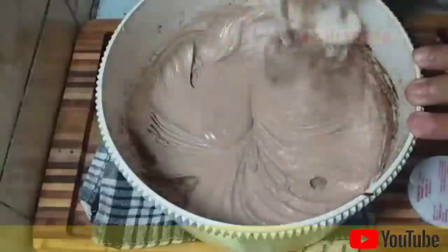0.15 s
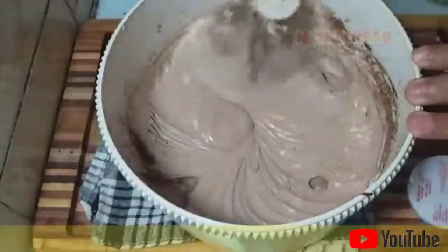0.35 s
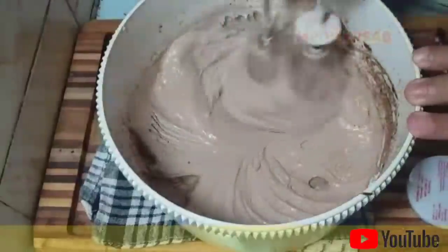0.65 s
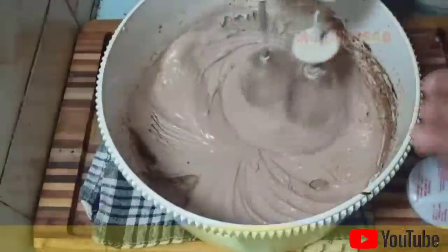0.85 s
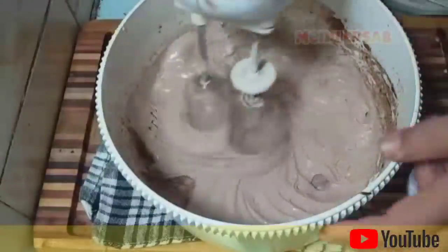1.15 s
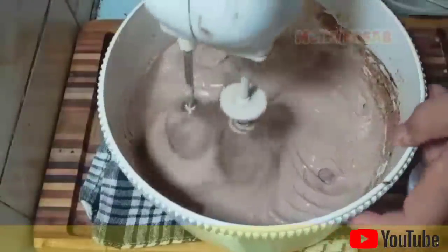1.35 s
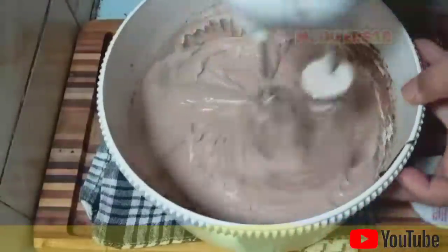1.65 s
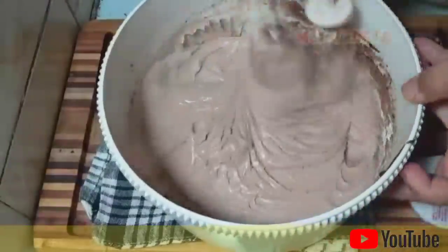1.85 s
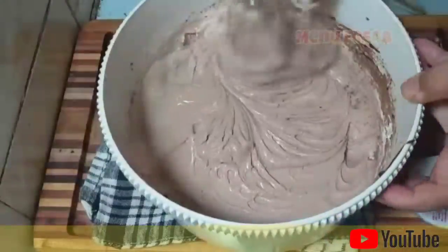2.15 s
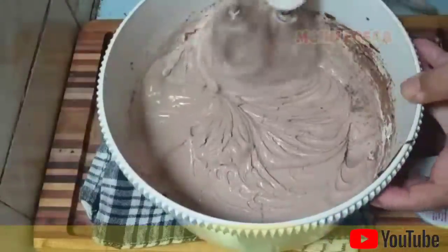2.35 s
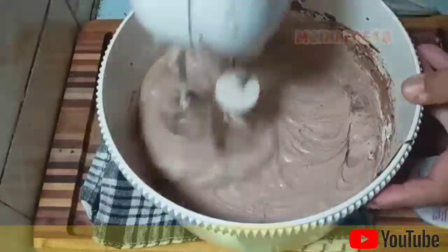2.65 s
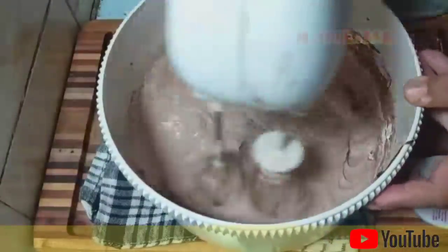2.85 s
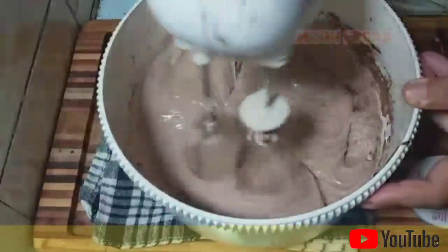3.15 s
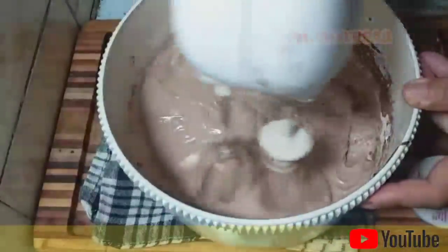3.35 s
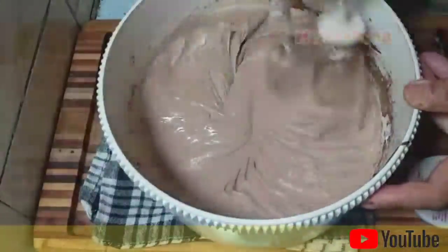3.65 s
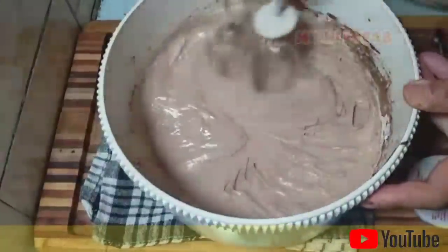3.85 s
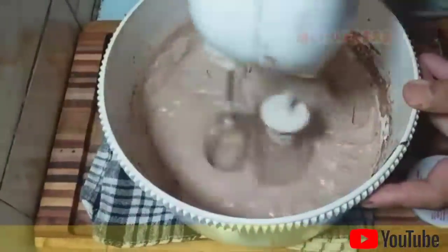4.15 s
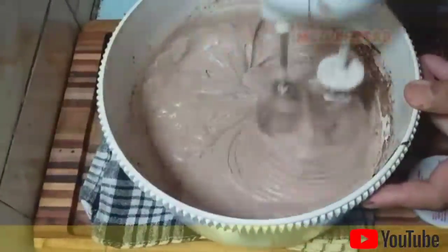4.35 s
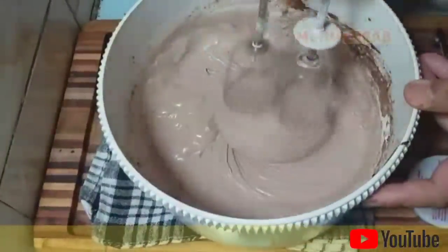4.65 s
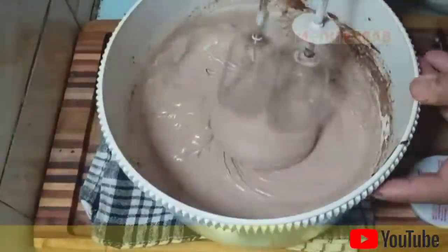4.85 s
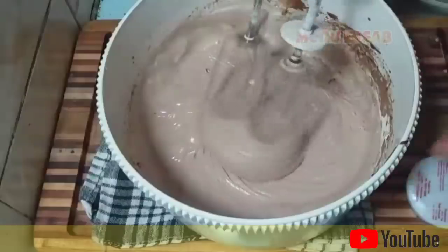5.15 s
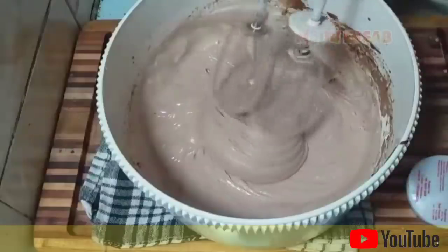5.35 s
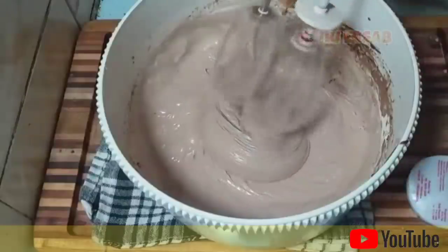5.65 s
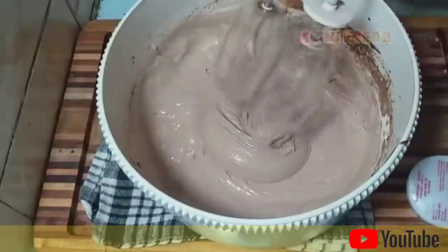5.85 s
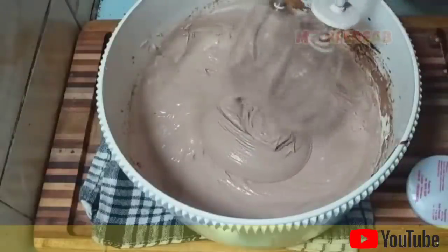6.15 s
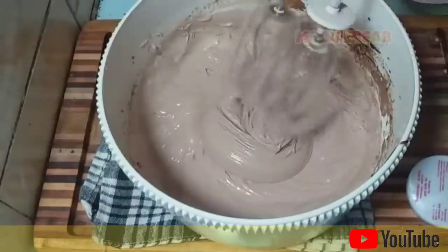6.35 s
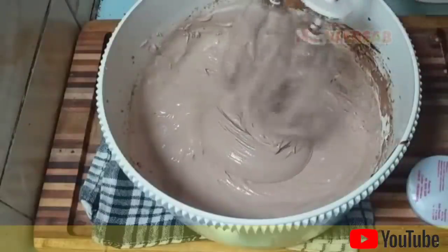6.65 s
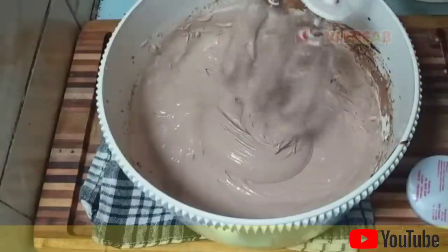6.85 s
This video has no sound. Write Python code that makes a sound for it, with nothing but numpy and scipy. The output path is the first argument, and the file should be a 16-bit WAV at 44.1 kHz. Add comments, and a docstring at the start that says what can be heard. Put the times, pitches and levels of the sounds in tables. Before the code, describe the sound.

Steady, raspy motor drone with whining overtones and hiss, wavering as the hand circles the bowl. Quick bursts of hard rattling knocks come early and near two seconds, with a few faint taps after. The load then eases, the whine climbs and turns shrill, a sharp plastic click cuts the power, and the mixer coasts downward without fully stopping. Small kitchen, close overloaded mono microphone.

```python
"""Hand mixer in thick batter

An electric hand mixer beats thick batter in a bowl, close to a mono microphone that overloads.
Motor: brush noise and shaft lines through housing spectra, plus whines locked to the shaft angle.
It sags under load and races as the beaters lift; their wires knock on the bowl in bursts of
noise and ringing modes. The switch snaps off, in noise bursts, and the motor coasts down.
"""
import sys
import numpy as np
from scipy import signal
from scipy.fft import rfft, irfft, next_fast_len
from scipy.io import wavfile
from scipy.ndimage import uniform_filter1d

SR = 44100
rng = np.random.default_rng(int(sys.argv[2]) if len(sys.argv) > 2 else 0)


def wav_record(signal):
    """Record a signal, one row per channel, as 16-bit PCM in the file named by sys.argv[1]."""
    frames = np.transpose(np.atleast_2d(signal))
    bounded = np.clip(frames, -1, 1)
    # unit amplitude maps onto the largest positive 16-bit level
    quanta = np.round(bounded * 32767).astype(np.int16)
    wavfile.write(sys.argv[1], SR, quanta)


N = 308739
TIME_S = np.arange(N) / SR

SLOTS, WIRES = 12, 4  # armature slots; wires per beater
MAINS_HZ = 50
OFF_S, COAST_S = 6.338, 1.305  # switch-off; time constant of the coasting
WORKING_TURNS_PER_S = 226
DB_PER_DOUBLING = 20.5  # part level against shaft speed
SLACK_S = 0.27  # time constant of the parts settling after switch-off
CEILING, EDGE_HZ = .95, 15750

# Nominal shaft speed with the power on: (time [s], speed [turns/s])
POWERED_SPEED = [(0, 227.2), (.4, 223.6), (.8, 223.3), (1.52, 226.5), (1.84, 234.2), (2.38, 245.3),
                 (2.7, 231.2), (3.03, 220.8), (3.28, 226.2), (3.5, 224.7), (3.85, 227.7), (4.2, 225.8),
                 (4.56, 221), (4.72, 226.5), (4.98, 239.5), (5.7, 264.6), (6, 270.7), (6.33, 273.8)]
# Freedom of the beaters from the batter: (time [s], share [0-1])
BEATER_LIFT = [(0, 0.57), (2.3, 0.14), (2.6, 0.13), (3.0, 0.38), (4.5, 0.42), (5.0, 0.75), (5.6, 0.84),
               (6.0, 1), (6.5, 0.98), (7, 1)]
# Swing of the mixer's level as the hand moves it, scaled per part: (time [s], level [dB])
HAND_SWELL = [(0, 1.8), (.33, .5), (.46, 0), (1.0, 0.5), (1.4, -0.16), (1.72, 2.4), (1.92, 0.5), (2.08, -3),
              (2.32, -2), (2.62, -3), (2.98, -1.2), (3.27, -4), (3.68, 1.5), (3.95, 0), (4.4, 2),
              (4.66, 1.1), (5.3, -0.77), (6.3, -1.6)]
# Mixer parts, by name: (level at working speed [dB], share of the swell [1],
# gain out of the batter [dB], gain with the power off [dB])
PART_LEVELS = {"churn": (-28.5, 1.5, -5, -2), "gears": (-28, 1.3, 6.5, -2), "shell": (-24.5, 1.87, 4.5, -5),
               "rasp": (-19, 1.26, 1.5, -8), "hiss": (-27.5, 1, 4, -7), "sing": (-21.5, 11.5, 8, -7),
               "order 4": (-42.5, .7, 11.5, -9), "order 8": (-40.5, 1.35, 6, -3)}
# Weak lines in the motor's vibration: (multiple of shaft speed [1], relative level [dB])
SHAFT_ORDERS = [(1, -26.5), (6, -23.5), (7, -28), (9, -26.5), (11, -66), (12, -24), (16, -37.5), (18, -62),
                (20, -24), (24, -18), (28, -19.5), (30, -31), (32, -22.5), (36, -15), (40, -41), (44, -20),
                (48, -13.5), (52, -18), (56, -35), (60, -15), (64, -27), (72, -24), (84, -24)]
# Whine at twice the shaft speed: (time [s], level [dB])
HUM_LEVEL = [(0, -25.5), (1.68, -25), (1.87, -19), (2.12, -18), (2.3, -25), (2.55, -22.5), (2.77, -34.5),
             (3.0, -26.5), (3.25, -29), (3.6, -23.5), (4.88, -22.5), (5.28, -30), (5.5, -20), (6.45, -23),
             (6.82, -34.5), (7, -63)]
# Whine at ten times the shaft speed: (time [s], level [dB])
HIGH_WHINE_LEVEL = [(0, -40), (.5, -44), (.95, -29.5), (1.45, -26.5), (2.0, -27), (2.5, -35), (2.68, -30),
                    (3.3, -32.5), (4.35, -23), (4.72, -33), (5.5, -21), (6.102, -32), (7, -38)]
# Magnetic whine of the armature: (time [s], level [dB])
MAGNETIC_LEVEL = [(0, -23), (0.402, -22.5), (.95, -33.5), (1.42, -23.5), (2.648, -39), (3.05, -26.5),
                  (3.3, -32), (3.851, -24.5), (4.32, -22), (4.72, -26), (5.15, -38), (5.45, -35),
                  (5.7, -49), (7, -59)]
# Resonances that lift a passing shaft tone: (centre [Hz], width [Hz], lift [dB])
TONE_RESONANCES = [(985, 78, 16.5), (1057.6, 51, 9), (1868, 320, 10), (2046, 125, 8.5)]
# Housing resonances: (centre [Hz], width [Hz], lift [dB])
HOUSING_MODES = [(604, 113, 8), (1802, 270, -6), (2070, 480, 5.5), (2596, 190, 2.5), (2933, 140, 4.5),
                 (3410, 34, 7), (3580, 117, 8.5), (4080, 45, 6), (4467, 240, 4), (5260, 180, 2),
                 (5820, 250, 3), (7030, 590, -3), (8330, 730, 4), (13650, 680, 5.5)]
# Spectrum of the batter churning: (frequency [Hz], relative level [dB])
CHURN_SPECTRUM = [(25, -47), (60, -22), (130, -11), (190, -6.5), (240, 4), (340, -11.5), (480, -33),
                  (800, -27)]
# Spectrum of the gear train: (frequency [Hz], relative level [dB])
GEAR_SPECTRUM = [(200, -38.5), (380, -6.5), (480, 4), (730, -5), (900, -0.5), (1150, -13), (1300, -4),
                 (1500, -8), (2200, -32)]
# Spectrum of the motor's rasp: (frequency [Hz], relative level [dB])
RASP_SPECTRUM = [(900, -28.5), (1400, -8), (1700, 0.5), (2200, -1.5), (2420, -4), (3150, -4), (4400, -7),
                 (5200, -28.5), (7500, -25.5)]
# Spectrum of the treble hiss, also of the knocks' tick: (frequency [Hz], relative level [dB])
HISS_SPECTRUM = [(3000, -33.5), (4900, 2.5), (6500, -0.5), (7900, 1.5), (8700, -9), (9300, -8.5),
                 (11000, -5), (15500, -6)]
# Colour of the vibration with the beaters free: (frequency [Hz], gain [dB])
FREE_RUN_GAIN = [(175, 5), (270, -3), (400, 5), (580, -7), (800, 10.5), (1050, 10), (1300, -4), (1750, 7),
                 (2200, -1), (2700, 5.5), (3100, -1), (4000, 8), (5000, 1.5), (7500, 1), (14000, -4)]
# Beater touches on the bowl: (time [s], strikes [count], gap between strikes [s],
# relative clack level [dB], relative thud level [dB], gain per further strike [dB])
BOWL_TOUCHES = [(.088, 1, .025, 1, -9.5, 0), (0.1182, 2, 0.025, -7.5, -30, 3),
                (0.1677, 2, .025, 0, -11, -4), (.248, 2, 0.023, -8, -30, 9.5), (.299, 1, .025, -5, -17, 0),
                (0.3373, 2, .0208, -9, -16, 4), (.383, 1, 0.021, -8, -20, 0),
                (1.8371, 2, 0.02, -1, -11, -0.5), (1.8817, 2, 0.023, 0, -12, -2.5),
                (1.9794, 2, 0.022, 0, -17, 3), (2.0736, 2, .0204, -3.5, -19, 7.5),
                (2.1839, 2, 0.022, -2, -13.5, -1.5), (2.2504, 2, .0214, -0.5, -17, 0.5),
                (2.3396, 2, 0.019, -3.5, -16, 2.5), (2.4545, 1, .021, -12.5, -20, 0),
                (2.847, 3, .022, -20.5, -17.5, 3), (2.973, 2, 0.027, -12, -38, -3.5),
                (3.643, 2, .0202, -12, -21, 8.5), (3.768, 1, .022, -8.5, -15, 0)]
# Nominal modes of wire and bowl: (frequency [Hz], relative level [dB], t60 [s])
BOWL_MODES = [(1479, -3, 0.062), (1725, 2.5, 0.045), (1913, -4.5, 0.066), (1907, -2.5, 0.074),
              (2504, 4, 0.051), (2900, -2, 0.02), (2892, -1, 0.078), (3253, -2.5, 0.055), (3313, -6, 0.062),
              (3950, -8.5, 0.06), (4580, -0.5, 0.043), (6100, -14, .05)]
# Spectrum of the clack: (frequency [Hz], relative level [dB])
CLACK_SPECTRUM = [(100, -35), (400, 0.5), (1000, 6.5), (1800, 7.5), (3000, 7), (4500, 2.5), (8000, -9.5),
                  (9500, -10), (15000, -41)]
# Spectrum of the dull thud: (frequency [Hz], relative level [dB])
THUD_SPECTRUM = [(120, -32.5), (200, -3), (280, -9), (370, -2.5), (540, 2.5), (750, -9.5), (1500, -51)]
# Spectrum of the wooden board under the bowl: (frequency [Hz], relative level [dB])
BOARD_SPECTRUM = [(25, -31), (60, -42), (110, 14), (160, -13), (300, -29)]
# Switch passing its detents: (time [s], level [dB])
SWITCH_DETENTS = [(6.342, 1.5), (6.355, -10), (6.402, -15)]
# Spectrum of the switch: (frequency [Hz], relative level [dB])
SNAP_SPECTRUM = [(200, -14), (1000, -3), (3000, 4), (4100, 4), (4330, 15), (4600, 4.5), (8000, 4.5),
                 (9500, -5), (15000, -1)]


def mixer(lump_db=2.0, chatter_db=1.5, sing_hz=2985, sing_width_hz=22, loose_from=0.748, loose_range=0.072):
    """The motor shakes the housing while the beaters churn the batter."""
    turns, beater_turns = shaft()
    level_db = part_levels()
    lines = shaft_lines(turns)
    brushes = unloaded(vibration(turns, beater_turns, lines))
    train = unloaded(vibration(turns, beater_turns, lines))

    body = amp(level_db["churn"] + lump_db * drift(13)) * unit(colour(brushes, CHURN_SPECTRUM))
    gears = unit(colour(train, GEAR_SPECTRUM, HOUSING_MODES))
    body += amp(level_db["gears"] + chatter_db * drift(31)) * gears
    body += amp(level_db["rasp"]) * unit(colour(brushes, RASP_SPECTRUM, HOUSING_MODES))
    body += amp(level_db["hiss"]) * unit(colour(train, HISS_SPECTRUM, HOUSING_MODES))
    body += amp(level_db["shell"]) * shell(beater_turns)

    # a narrow ring sets in once the batter no longer damps the beaters
    loose = np.clip((curve(BEATER_LIFT) - loose_from) / loose_range, 0, 1)
    sing = loose * amp(level_db["sing"]) * resonate(rng.standard_normal(N), sing_hz, sing_width_hz)
    return reflections(body) + whine(turns, level_db) + sing


def motor_speed():
    """Shaft speed [turns/s]: set by the load, decaying exponentially once the power is off."""
    return curve(POWERED_SPEED) * np.exp(-np.maximum(TIME_S - OFF_S, 0) / COAST_S)


def shaft(wobble=0.000867, flutter=0.00089, gear_ratio=20.5):
    """Shaft and beater angles in turns; the batter drags on each wire in passing."""
    speed = motor_speed()
    beater_turns = np.cumsum(speed) / SR / gear_ratio
    drag = flutter * np.sin(2 * np.pi * WIRES * beater_turns)
    turns = np.cumsum(speed * (1 + wobble * drift(12.2) + drag)) / SR
    return turns, beater_turns


def part_levels():
    """Level [dB] of every part over time, from speed, swell, lift out of the batter and power."""
    pace_db = DB_PER_DOUBLING * np.log2(motor_speed() / WORKING_TURNS_PER_S)
    swell_db = curve(HAND_SWELL)
    lift = curve(BEATER_LIFT)
    slack = 1 - np.exp(-np.maximum(TIME_S - OFF_S, 0) / SLACK_S)
    return {name: db + pace_db + share * swell_db + free_db * lift + off_db * slack
            for name, (db, share, free_db, off_db) in PART_LEVELS.items()}


def shaft_lines(turns):
    """Play in the bearings roughens the many weak multiples of the shaft speed."""
    return sum(amp(db) * line(round(order) * turns, fade_db=2.5, fuzz=.33) for order, db in SHAFT_ORDERS)


def vibration(turns, beater_turns, lines, chop=0.32, mains_pulse=0.026, throb=0.008, grain=0.23, lines_db=-2):
    """Brushes scrape over the commutator bars; lines of the shaft ride on the scraping."""
    bars = 1 + chop * np.cos(2 * np.pi * SLOTS * turns)
    current = 1 + mains_pulse * np.cos(2 * np.pi * 2 * MAINS_HZ * TIME_S) * (TIME_S < OFF_S)
    sway = 1 + throb * (np.sin(2 * np.pi * beater_turns) + np.sin(2 * np.pi * WIRES * beater_turns))
    sparks = np.exp(grain * unit(uniform_filter1d(rng.standard_normal(N), size=25)))
    scrape = unit(rng.standard_normal(N) * bars * current * sparks)
    return sway * (scrape + amp(lines_db) * lines)


def unloaded(x):
    """Out of the batter the loose beaters and gears rattle with another colour."""
    lift = np.clip(curve(BEATER_LIFT), 0, 1)
    table_hz, table_db = np.transpose(FREE_RUN_GAIN)
    size = next_fast_len(N)
    hz = np.fft.rfftfreq(size, 1 / SR) + 1
    gain = amp(np.interp(np.log(hz), np.log(table_hz), table_db))
    free = irfft(rfft(x, size) * gain, size)[:N]
    return (1 - lift) * x + lift * free


def shell(beater_turns, mode_hz=1045, width_hz=150, throb=0.083):
    """The shell's main resonance, pushed each time a wire ploughs through the batter."""
    push = rng.standard_normal(N) * (1 + throb * np.sin(2 * np.pi * WIRES * beater_turns))
    return resonate(resonate(push, mode_hz, width_hz), mode_hz, width_hz)


def whine(turns, level_db, slots_db=-4):
    """The strong shaft orders, and the twelve armature slots beating with the mains pull."""
    hum = amp(curve(HUM_LEVEL)) * line(2 * turns, fade_db=.3, fuzz=.08)
    upper = sum(tone(order * turns, level_db["order " + str(order)]) for order in (4, 8))
    high = amp(curve(HIGH_WHINE_LEVEL)) * line(10 * turns, fade_db=.8, fuzz=.22)
    slots = line(SLOTS * turns, fade_db=1, fuzz=.16)
    sideband = line(SLOTS * turns - 2 * MAINS_HZ * TIME_S, fade_db=1, fuzz=.16)
    magnetic = amp(curve(MAGNETIC_LEVEL)) * (sideband + amp(slots_db) * slots)
    return hum + upper + high + magnetic


def tone(turns, db, fade_db=2.0, fuzz=0.2):
    """A partial that grows louder near each resonance."""
    pitch_hz = np.gradient(turns) * SR
    boost_db = sum(lift_db / (1 + (2 * (pitch_hz - centre_hz) / width_hz) ** 2)
                   for centre_hz, width_hz, lift_db in TONE_RESONANCES)
    return amp(db + boost_db) * line(turns, fade_db, fuzz)


def line(turns, fade_db, fuzz):
    """One partial of rms near 1 that fades slowly and trembles quickly in level and phase."""
    level = amp(fade_db * drift(4.9)) * (1 + fuzz * drift(40))
    phase = 2 * np.pi * (turns + rng.random()) + fuzz * drift(50)
    return np.sqrt(2) * level * np.cos(phase)


def reflections(x, travel=0.0546, strength=0.22):
    """Bowl and counter reflect the motor over paths that change as the hand circles."""
    out = x
    for delay_s in (.0017, .0031, .0058):
        moving_delay_s = delay_s * (1 + travel * drift(1.04))
        out = out + strength * np.interp(TIME_S - moving_delay_s, TIME_S, x)
    return out / np.sqrt(1 + 3 * strength ** 2)


def knocks(ring_db=-7.0, clack_db=0.0, thud_db=1, tick_db=-3, board_db=-20):
    """Wires hit the wall: tick, clack, ring of wire and bowl, dull thud, thump into the board."""
    s, clack, thud = strikes()
    ring = bowl_ring(s, clack + ring_db)
    clacks = blows(s, clack + clack_db, decay_s=0.0043, room_db=-11.5, room_s=0.035, impact=8.5)
    ticks = blows(s, clack + tick_db, decay_s=0.0023, room_db=-11.5, room_s=0.016)
    thuds = blows(s, thud + thud_db, decay_s=0.007, room_db=-13.0, room_s=0.067, impact=8.6)
    thumps = blows(s, clack + board_db, decay_s=0.0037, room_db=-17.5, room_s=0.12, impact=6.7)
    out = ring + colour(clacks, CLACK_SPECTRUM) + colour(ticks, HISS_SPECTRUM)
    return out + colour(thuds, THUD_SPECTRUM) + colour(thumps, BOARD_SPECTRUM)


def strikes():
    """Time [s], clack [dB] and thud [dB] of every wire that hits in turn during the touches."""
    return np.transpose([(s + k * gap_s, clack_db + k * gain_db, thud_db + k * gain_db)
                         for s, count, gap_s, clack_db, thud_db, gain_db in BOWL_TOUCHES
                         for k in range(round(count))])


def bowl_ring(times_s, levels_db, spot_db=3, detune=0.007):
    """Every blow lands on another spot, so it rings the decaying modes in other shares."""
    t = np.arange(SR // 4) / SR
    out = np.zeros(N)
    hz, mode_db, t60_s = np.transpose(BOWL_MODES)[:, :, None]
    decay = np.exp(-np.log(1000) * t / t60_s)
    for s, db in zip(times_s, levels_db):
        share, shift, phase = rng.standard_normal((3, len(BOWL_MODES), 1))
        wave = np.sin(2 * np.pi * (hz * (1 + detune * shift) * t + phase))
        modes = amp(mode_db + spot_db * share) * decay * wave
        add(out, s, amp(db) * modes.sum(0))
    return out


def blows(times_s, levels_db, decay_s, room_db, room_s, impact=0):
    """Each blow: a one-sample impact, a chatter that dies fast, then the kitchen's short echo."""
    t = np.arange(SR // 3) / SR
    out = np.zeros(N)
    shape = np.hypot(np.exp(-t / decay_s), amp(room_db) * np.exp(-t / room_s))
    for s, db in zip(times_s, levels_db):
        add(out, s, amp(db) * (shape * rng.standard_normal(len(t)) + impact * (t == 0)))
    return out


def switch():
    """The plastic slider snaps to off through its detents, a noise burst at each."""
    s, db = np.transpose(SWITCH_DETENTS)
    return colour(blows(s, db, decay_s=0.0076, room_db=-7.5, room_s=0.036), SNAP_SPECTRUM)


def resonate(x, hz, width_hz):
    """One resonance driven by x, at an rms of 1."""
    return unit(signal.lfilter(*signal.iirpeak(hz, hz / width_hz, SR), x))


def colour(x, spectrum, modes=()):
    """Sends x through a body with this spectrum and these resonances."""
    return signal.oaconvolve(x, response(spectrum, modes))[:N]


def response(spectrum, modes=(), size=4096):
    """Causal impulse response of a broad spectrum with resonances standing on it."""
    hz = np.abs(np.fft.fftfreq(size, 1 / SR)) + 1
    table_hz, table_db = np.transpose(spectrum)
    db = np.interp(np.log(hz), np.log(table_hz), table_db)
    # falls away beyond both ends
    db = db - 20 * np.log10(np.maximum(table_hz[0] / hz, 1) * np.maximum(hz / table_hz[-1], 1))
    for centre_hz, width_hz, lift_db in modes:
        db = db + lift_db / (1 + (2 * (hz - centre_hz) / width_hz) ** 2) ** 2
    return minimum_phase(db)


def minimum_phase(db):
    """The most prompt impulse response with this gain curve, scaled to energy 1."""
    log_gain = np.log(amp(db))
    phase = -signal.hilbert(log_gain).imag
    taps = np.fft.ifft(np.exp(log_gain + 1j * phase)).real[:len(db) // 2]
    return taps / np.linalg.norm(taps)


def drift(rate_hz):
    """Smooth chance of rms 1 that moves mostly slower than rate_hz."""
    steps = rng.standard_normal(2048)
    hz = np.fft.rfftfreq(len(steps), N / SR / len(steps))
    smooth = unit(irfft(rfft(steps) * np.exp(-(hz / rate_hz) ** 2)))
    return np.interp(TIME_S, np.linspace(0, N / SR, len(steps)), smooth)


def curve(table):
    """A (time [s], value) table, interpolated sample by sample."""
    s, value = np.transpose(table)
    return np.interp(TIME_S, s, value)


def amp(db):
    """Decibels to gain."""
    return 10 ** (np.asarray(db) / 20)


def unit(x):
    """Scales to an rms of 1."""
    return x / np.sqrt(np.mean(x ** 2) + 1e-20)


def add(mix, s, sound):
    """Places a sound in the mix at time s."""
    part = mix[round(s * SR):][:len(sound)]
    part += sound[:len(part)]


def scene():
    """Everything reaches one microphone; both channels are the same."""
    return np.tile(mixer() + knocks() + switch(), (2, 1))


def record(dry):
    """The input clips hard at its ceiling; then the band limit."""
    edge = signal.firwin(511, EDGE_HZ, window=("kaiser", 8), fs=SR)
    return signal.oaconvolve(np.clip(dry, -CEILING, CEILING), edge[None], "same")


dry = scene()
out = record(dry)
wav_record(out)
```